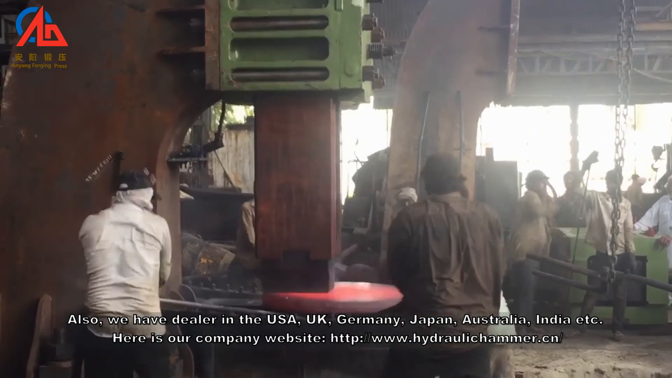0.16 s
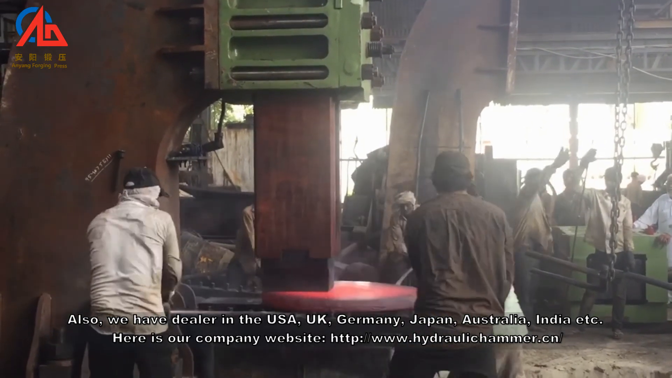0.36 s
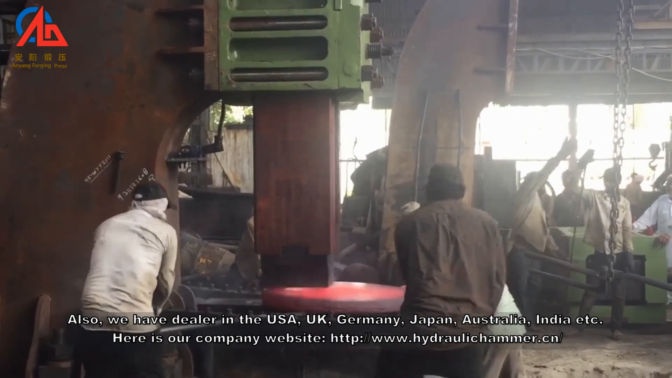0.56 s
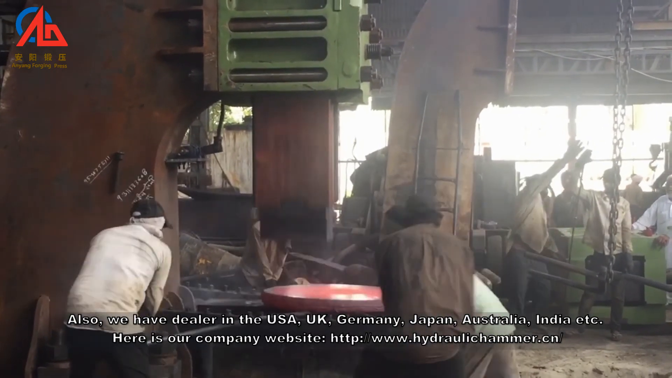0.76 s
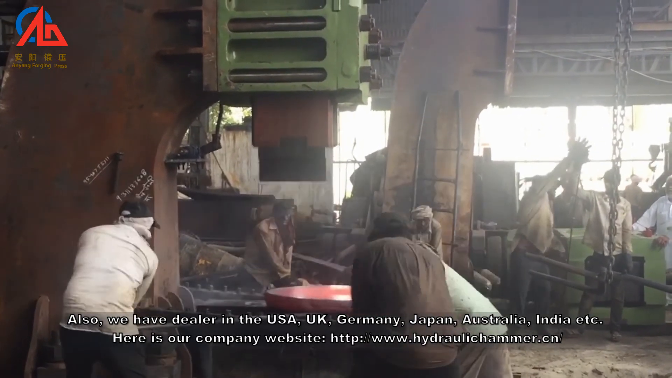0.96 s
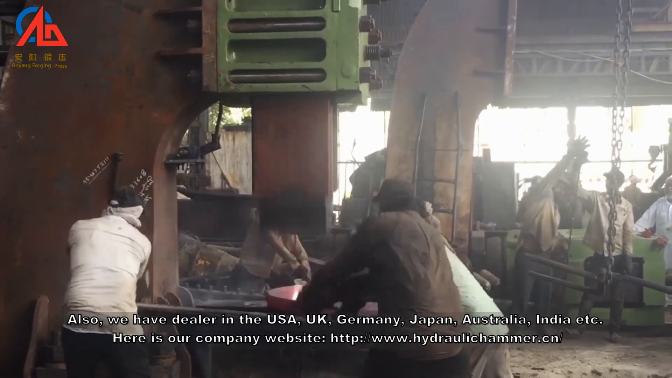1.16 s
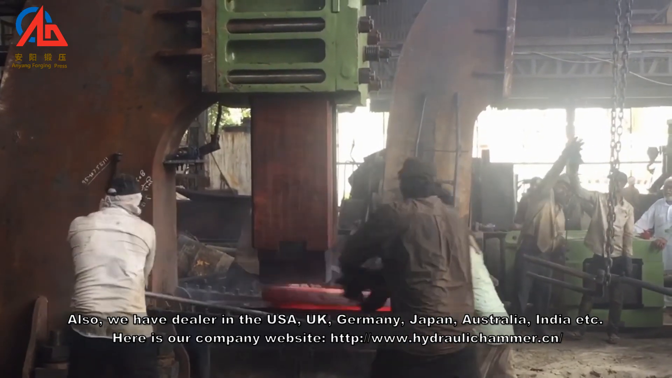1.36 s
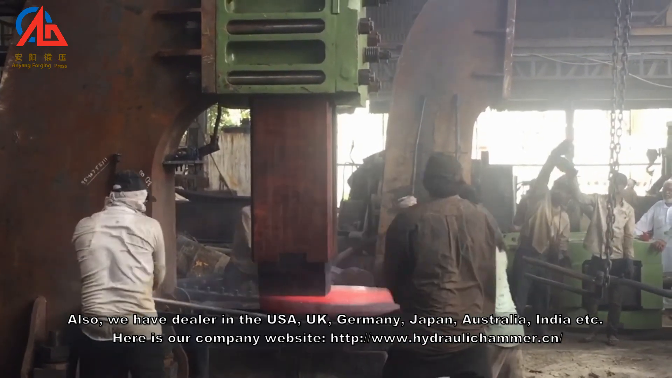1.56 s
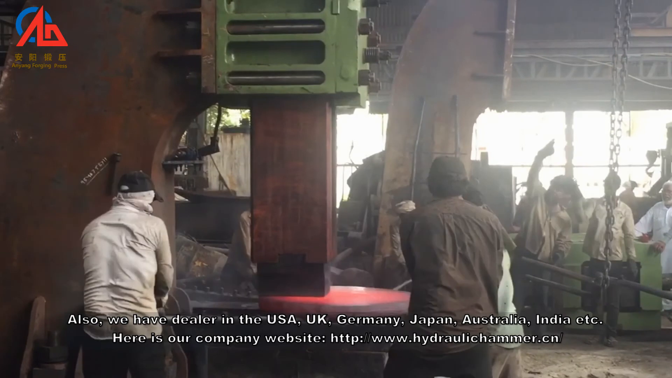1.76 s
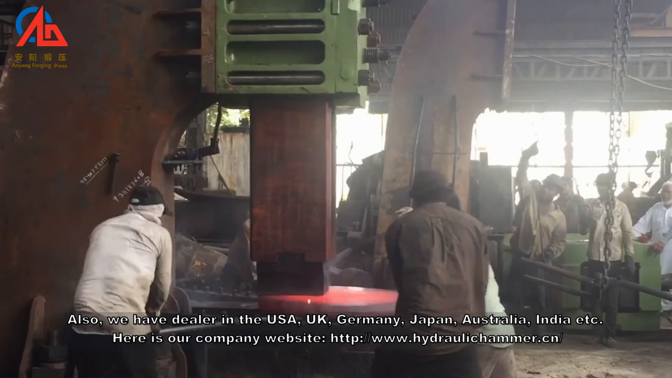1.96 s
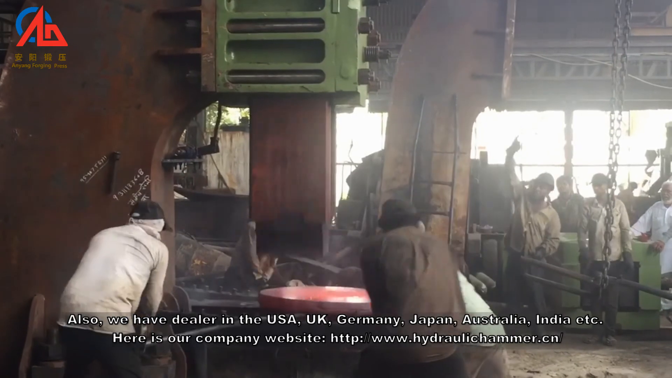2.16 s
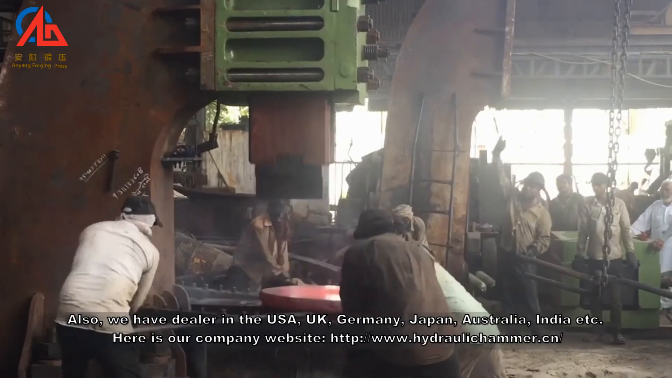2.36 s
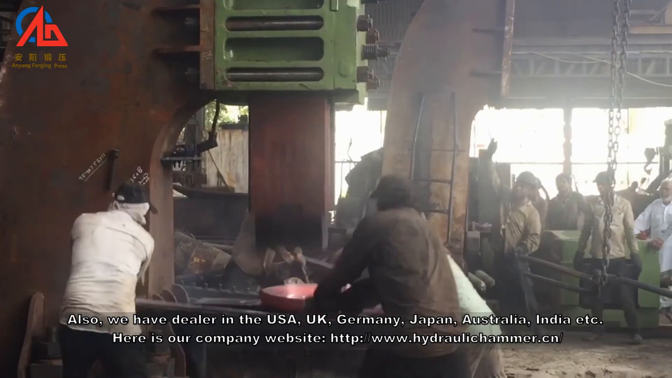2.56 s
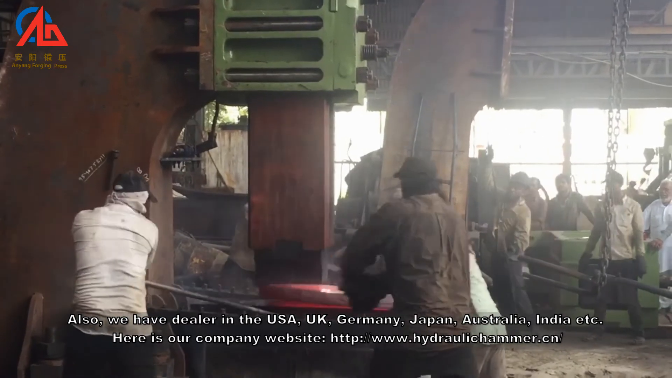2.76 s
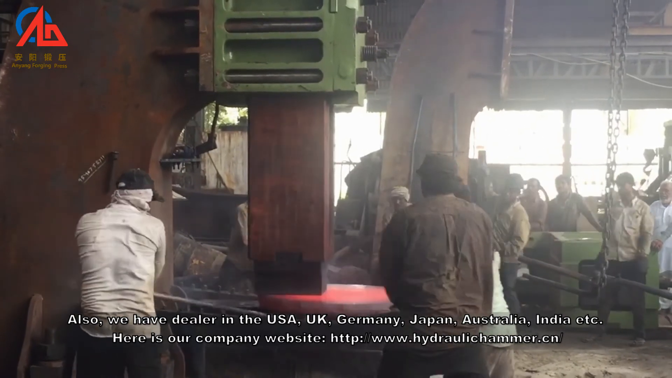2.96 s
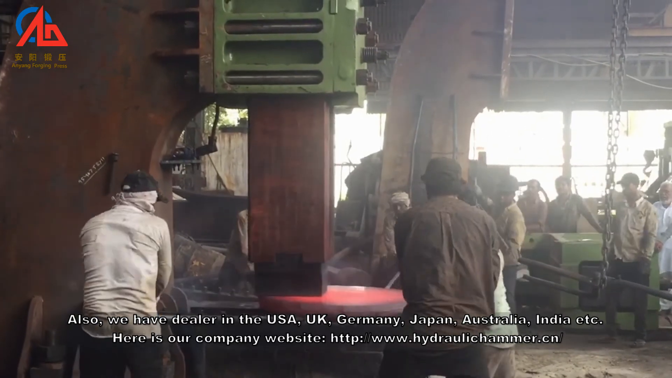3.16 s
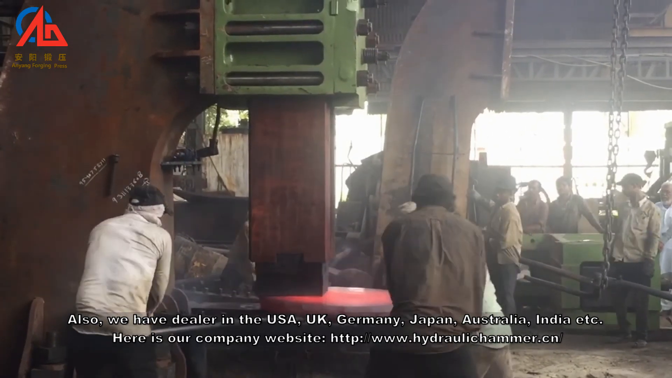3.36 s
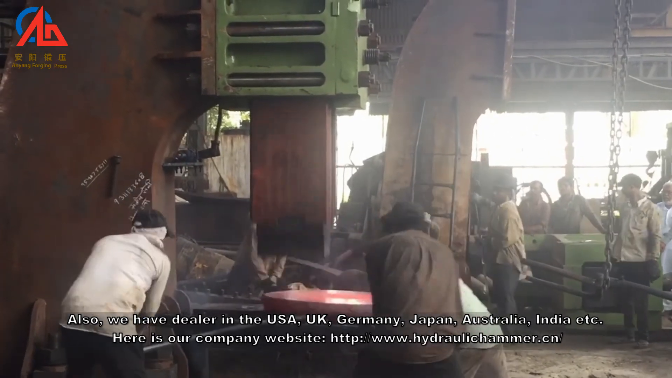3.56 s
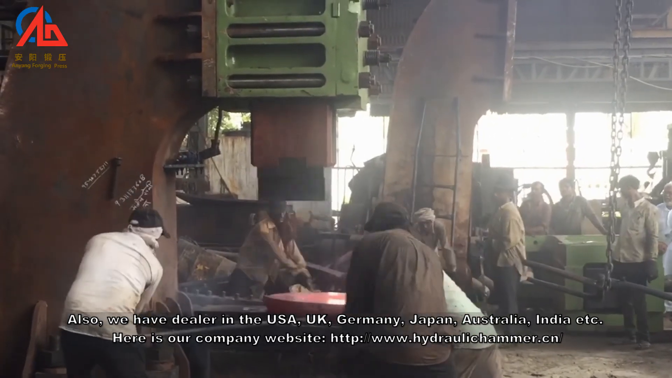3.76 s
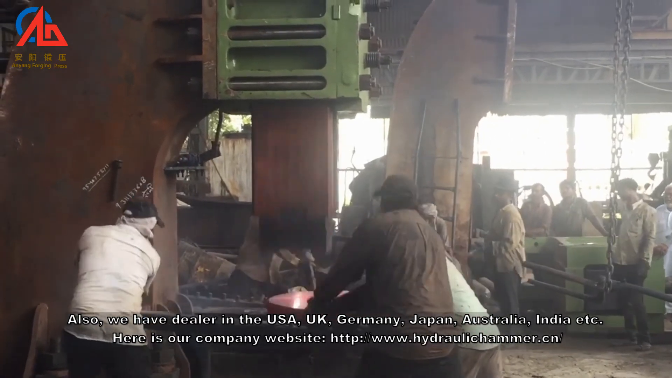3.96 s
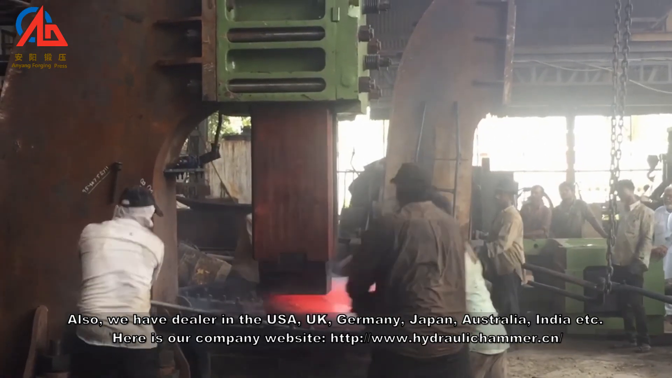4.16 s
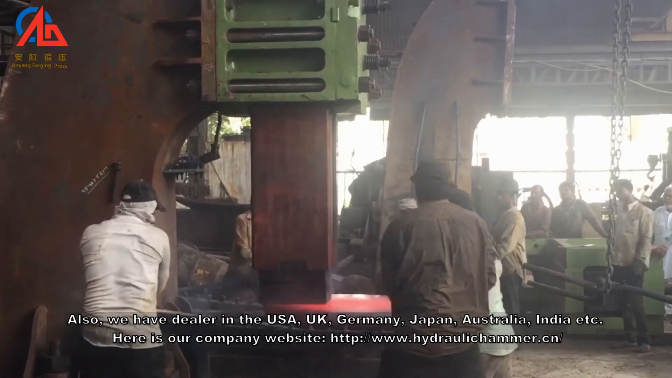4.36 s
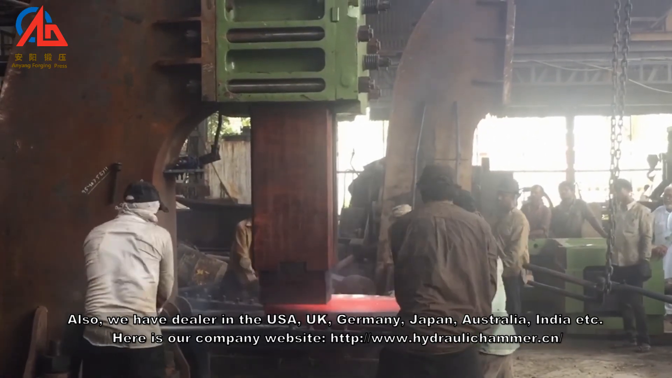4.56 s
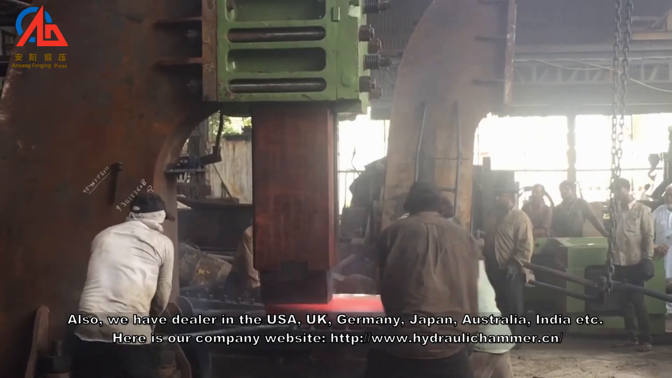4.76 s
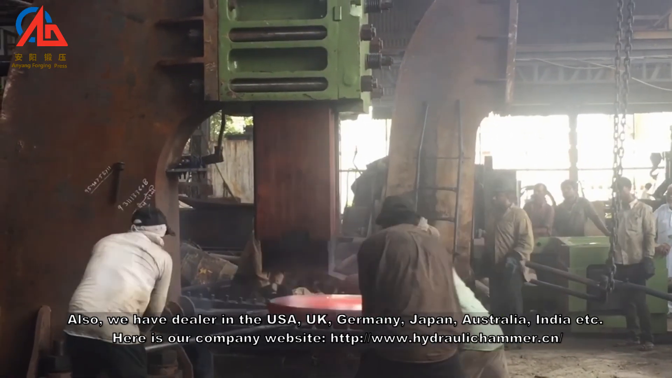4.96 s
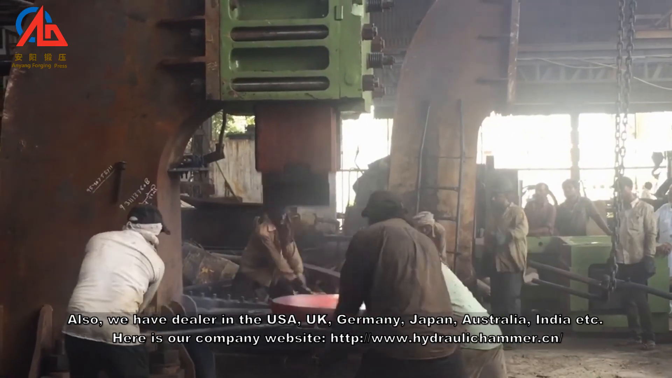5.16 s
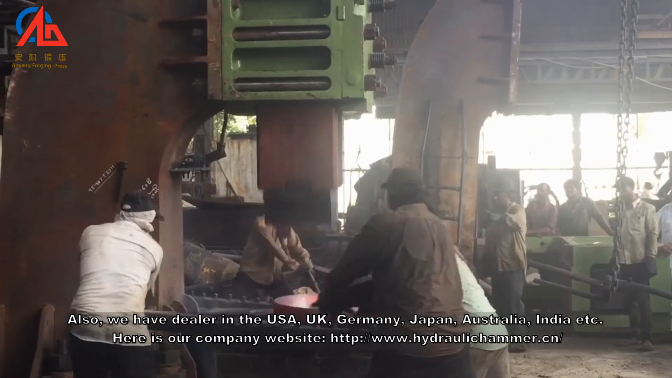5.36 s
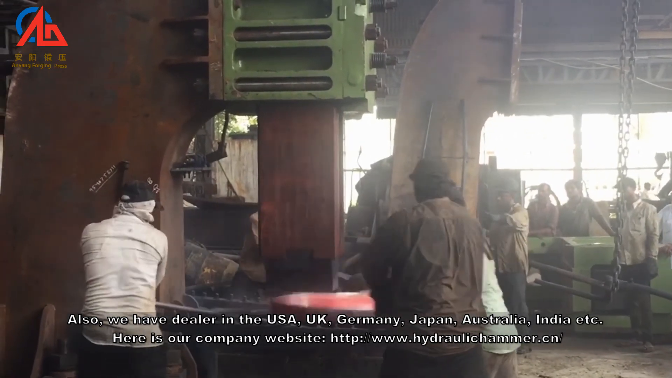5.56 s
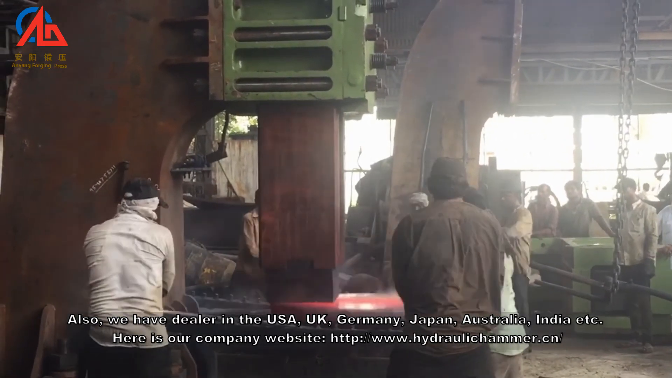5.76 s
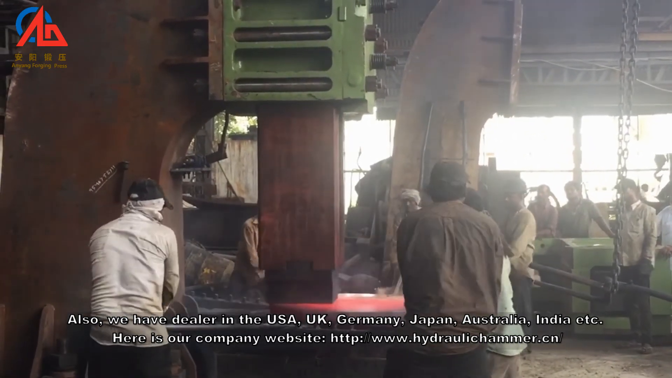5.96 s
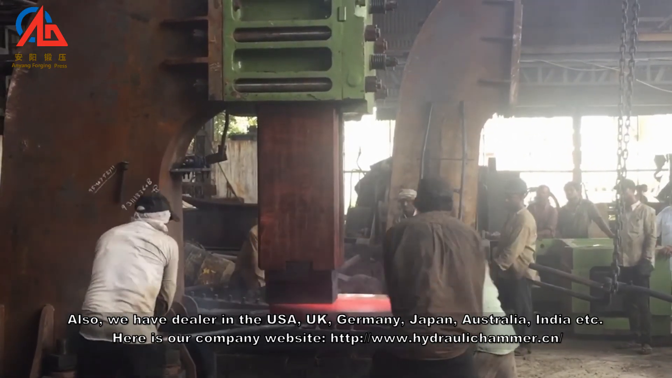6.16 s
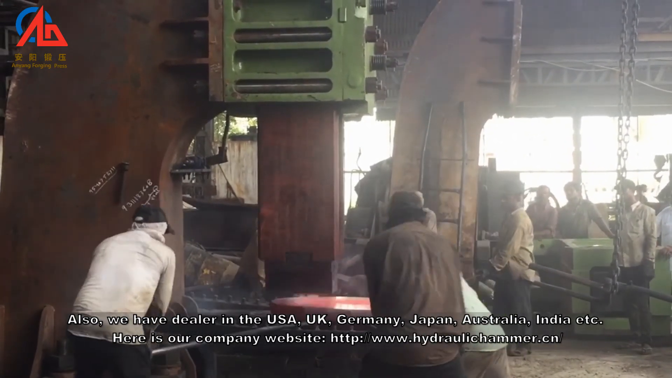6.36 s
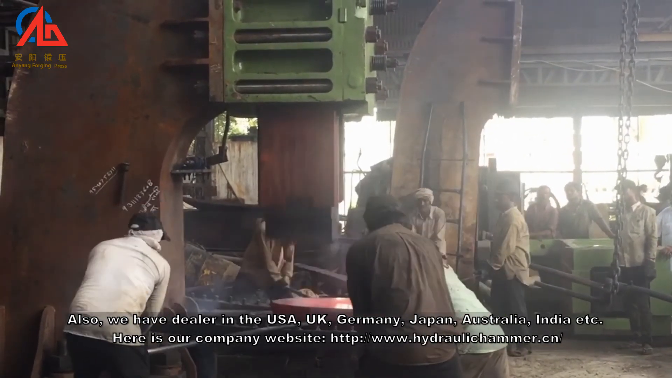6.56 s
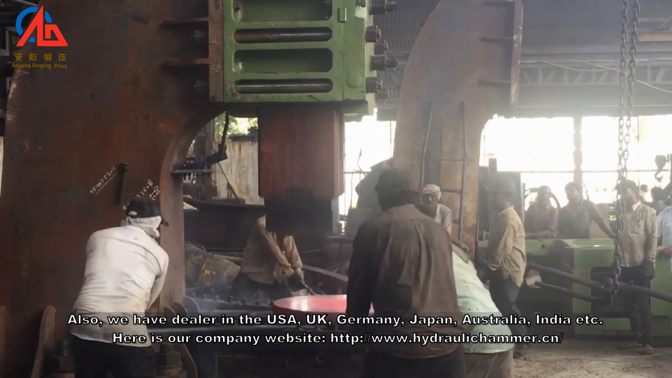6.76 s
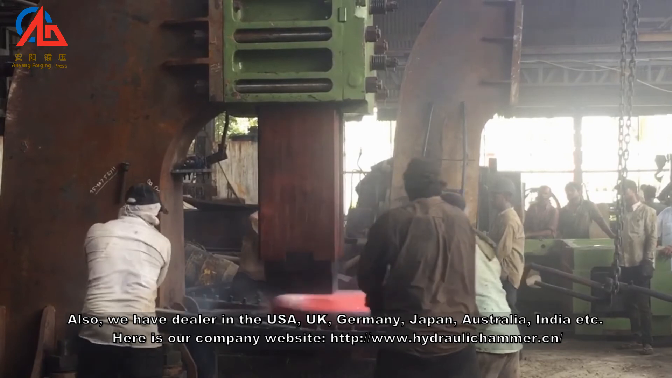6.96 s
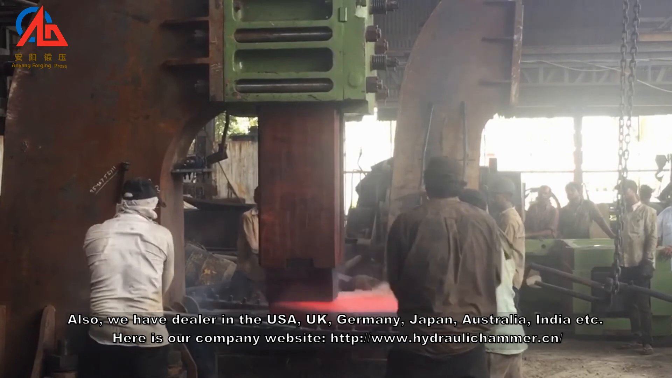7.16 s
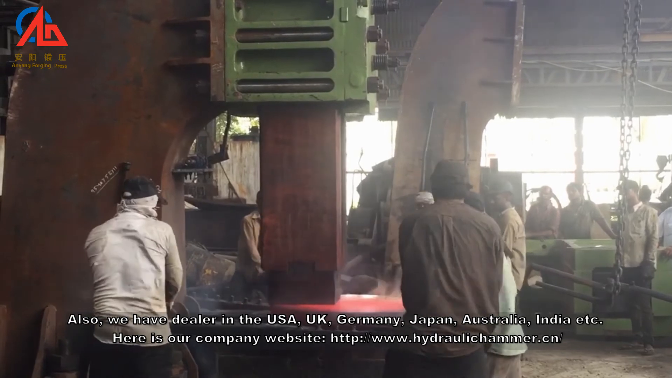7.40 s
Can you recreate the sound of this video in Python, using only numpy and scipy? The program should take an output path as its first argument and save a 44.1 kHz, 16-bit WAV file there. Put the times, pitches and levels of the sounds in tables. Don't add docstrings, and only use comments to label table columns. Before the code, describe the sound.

A massive power hammer forges a hot steel disc in a large, reverberant hall, heard close with slight treble width. Crashing blows land at 0, 1.4, 2.75, 4.15, 5.6 and 7.05 seconds, the first already in progress. Each is an overloaded, distorted slam with deep anvil thump, jangling ram and a bell-like ring near 1500 Hz, strongest on the second and third; a duller rebound follows about 0.2 seconds later. The level sags briefly after impact, while frame shake rumbles and a plate hums faintly. Between blows the ram roars and hisses, building slowly from 0.6 to 1.4, briefly near 2.3, then from 3.4, 4.9 and 6.4. Guides squeal around 2.3, 3.4-4, 5.2 and 6.5-7; valve gear yelps at 1.2, 4, 5.3-5.5 and 6.9. Tools knock around 0.9, 1.2, 2.5 and 3.9. A very high, thin leak whistle wavers throughout, and the last blow's tail carries to the end.

```python
import sys
import numpy as np
from scipy import signal
from scipy.io import wavfile
from scipy.ndimage import uniform_filter1d

SR = 44100
rng = np.random.default_rng(int(sys.argv[2]) if len(sys.argv) > 2 else 0)


def file_out(sig):
    cols = np.atleast_2d(sig).T
    lim = np.clip(cols, -1, 1)
    pcm = np.round(lim * 32767).astype(np.int16)
    wavfile.write(sys.argv[1], SR, pcm)


def boost_factor(decibels):
    exponent = np.asarray(decibels, float) / 20
    return 10 ** exponent


N = 327663

# start_s, crash_db, thump_db, ring_db, bell_db
BLOWS = [
    (-.003, 1.5, 1, 2.5, -6.5),
    (1.3785, 4.5, -0.5, 2, -2),
    (2.756, 4.5, -1.5, 3, -1),
    (4.1653, 3, 0, 3, -6),
    (5.6218, 5.5, 0.5, 2, -5),
    (7.0412, 5, 2, 1.5, -2.5),
]
# freq_hz, level_db (per Hz)
CRASH_SPECTRUM = [(30, -47), (60, -8), (108, 2.5), (235, -2), (342, -13.5), (654, -2.5), (800, -13.5),
                  (1250, -9.5), (2060, -13.5), (4040, -15), (4930, -18.5), (15500, -34.5)]
# freq_hz, t60_s
CRASH_DECAY = [(60, 0.24), (200, 0.4), (600, 0.44), (1500, 0.42), (4000, 0.29), (9000, 0.28), (15000, 0.22)]
# pitch_hz, level_db, t60_s
ANVIL_MODES = [(92.5, -0.5, 0.65), (136.8, 3.5, 0.33), (204.6, -2, 0.42), (362.3, -13.5, 1),
               (559, -14, 0.23), (652, -1, 0.23), (686, -4, 0.25)]
# pitch_hz, level_db, t60_s
RAM_MODES = [(822, -8, .5), (998, -13, .5), (1175, -11, .4), (1404, -9, .3), (1505, -8, .4),
             (1553, -10, .3), (1624, -10, .3), (1744, -7, .5), (1795, -6, .4), (1916, -11, .3),
             (2016, -10, .3), (2140, -10, .35), (2380, -17, .5), (2676, -14, .5), (3144, -15, .3),
             (3307, -15, .3), (3505, -15, .3), (3748, -13, .3), (3851, -14, .3), (3910, -15, .3),
             (4177, -15, .25), (4307, -14, .25), (4478, -21, 1.)]
# start_s, peak_db, low_weight_db, brightness_db, t60_s
KNOCKS = [(0.154, -2.5, -18, 3, 0.83), (0.579, -22.5, -13, 8, 1), (0.918, -13.5, 4.5, -7, 1),
          (1.209, -14.5, -3, 7, 0.41), (1.233, -12, -2, 3, 0.99), (1.569, 0, 5, 2.5, 0.83),
          (2.489, -13.5, -13, -5, 0.48), (2.609, -15.5, 5, 8, 0.28), (2.63, -13, -1.5, -3, 0.99),
          (2.944, 3.5, -1, 4.5, 0.5), (3.892, -11.5, -1, -7, 0.46), (4.027, -14.5, -9, -2, 0.43),
          (4.356, 0, -1, 3.5, 0.3), (4.392, -2.5, 19, 6.5, 1), (5.339, -15, 9, -12, 0.58),
          (5.809, -2.5, 5, 1.5, 0.64), (5.903, -12, -21, 3, 0.5), (6.769, -16, 6, -8, 0.56),
          (6.899, -22, -3, -3, 0.88), (7.243, -3, -2, 1, 1)]
# freq_hz, level_db (per Hz)
KNOCK_SPECTRUM = [(35, -43), (60, -16), (98, 3.5), (226, -9), (721, -8.5), (889, -9), (1520, -7),
                  (3840, -22), (11200, -42), (15500, -53)]
# frame_shake_db, valve_opens_s, first_pressure_db, full_s, full_pressure_db
STROKES = [
    (-2, 0.58, -13, 1.49, 2.5),
    (0, 2.18, -8, 2.35, -5),
    (1, 3.36, -12, 4.14, 0.5),
    (3.2, 4.89, -9.5, 5.464, 1.1),
    (0.5, 6.39, -10, 6.9, -0.5),
    (-1, 7.6, -9.5, 8.4, -1.5),
]
# freq_hz, level_db (per Hz)
SHOP_SPECTRUM = [(15, -54), (25, -9), (66, -20), (136, -3), (233, -9.5), (649, -8), (1050, -11.5),
                 (2360, -21), (2850, -23.5), (3940, -27.5), (6060, -25.5), (7510, -29), (8140, -30.5),
                 (10400, -27), (15500, -35.5)]
# centre_hz, width_hz, level_db
SHOP_HOLLOWS = [(2780, 77, 4.5), (3080, 280, 2), (4230, 150, 2), (8250, 330, 7.5), (10470, 480, -8),
                (11500, 380, 3)]
LAYER_EDGES_HZ = (300, 1800, 6000)
IDLE_DB = [-37, -38, -41, -50]
SHAKE_DB = [-17, -14.5, -31.5, -45]
SHAKE_FALL_DB_PER_S = [60, 57, 46, 45]
PUSH_DB = [-20, -27.5, -25.5, -36.5]
PUSH_FOLLOWS = [0.88, 0.84, 1.07, 1.1]
SURGE_DB = [2, 0.69, 0.2, .6]
GUIDES_HZ = [2300, 2490, 2590, 2750, 2920, 3070, 3190, 3450, 3800, 4390, 4535, 4942, 5320, 5770, 6150, 6620,
             7025, 7480, 8070, 8255, 9000, 9700, 11000, 11400, 12700]
# start_s, length_s, pitch_hz, level_db
SQUEALS = [(.62, .2, 3112, -43), (.62, .2, 2745, -48), (2.2, .16, 3260, -45), (2.3, .13, 2755, -29),
           (2.42, .2, 2756, -47), (2.3, .35, 4942, -45), (2.3, .25, 4393, -48), (2.33, .2, 8150, -44),
           (2.2, .35, 1030, -42), (3.4, .45, 2928, -35), (3.72, .33, 2921, -32), (3.62, .55, 2775, -38),
           (3.45, .3, 6148, -40), (3.8, .3, 6150, -44), (3.5, .6, 4535, -48), (3.7, .3, 4385, -44),
           (3.55, .5, 7020, -48), (3.55, .6, 8070, -48), (3.9, .26, 11803, -45), (5.05, .15, 2545, -40),
           (5.18, .2, 2588, -36), (5.42, .22, 3200, -37), (6.15, .3, 3160, -44), (6.5, .4, 3183, -39),
           (6.86, .2, 3150, -31), (6.55, .25, 2760, -41), (6.88, .17, 2720, -34), (6.5, .3, 3450, -46),
           (6.5, .15, 4945, -47), (6.62, .11, 5285, -40)]
# start_s, pitch_hz, level_db
YELPS = [
    (1.22, 2584, -44),
    (1.22, 1400, -37),
    (4.02, 1300, -31),
    (5.3, 1750, -34),
    (5.47, 1050, -31),
    (6.92, 1420, -32),
    (6.91, 1100, -33),
]
HUM_DB = [-53, -50, -49, -45, -46, -40]
# time_s, pitch_hz
LEAK_PITCH = [(.2, 14881), (.5, 15021), (.81, 14508), (1.21, 15600), (1.4, 15100), (1.7, 14049),
              (2.04, 14575), (2.44, 13988), (2.79, 15032), (3.15, 15371), (3.36, 14985), (3.8, 14955),
              (4.59, 14523), (5.36, 15728), (5.7, 15099), (6.31, 14062), (6.86, 14372), (7.03, 13878)]
# freq_hz, side_against_mid_db
SIDE_DB = [(60, -37), (300, -51), (800, -42.5), (1500, -31), (3100, -20), (6800, -17), (11000, -16),
           (15000, -12)]
# after_blow_s, gain_db
GAIN_SAG = [(0, -5), (.03, -5.5), (.1, -7), (.17, -11), (.3, -5), (.5, -2.5), (.7, -0.5)]

SHUT_DB = -16


def blow(crash_db, thump_db, ring_db, bell_db):
    hz, t = np.fft.rfftfreq(256, 1 / SR), np.arange(SR) / SR
    colour_db, t60 = read(CRASH_SPECTRUM, hz), read(CRASH_DECAY, hz)
    crash = burst(colour_db, t60, count=len(t), rise_s=0.0019)
    add(crash, 0, boost_factor(-5) * clang())
    hall_db = colour_db - 3.7 * np.log2(1 + hz / 1500)
    hall = burst(hall_db, 3.71 * t60, count=len(t), rise_s=0.1)
    thump = ring(ANVIL_MODES, t, spread_db=6.5) * (1 - np.exp(-t / 0.017))
    shimmer = ring(RAM_MODES, t, spread_db=3) * (1 - np.exp(-t / 0.003))
    impact = boost_factor(crash_db) * (crash + boost_factor(-9) * hall)
    return impact + boost_factor(thump_db) * thump + boost_factor(ring_db) * shimmer + bell(bell_db, t)


def bell(level_db, t, pitch_hz=1520, t60=1.5, contact_s=0.135):
    damping_db = -13 * np.clip((t - contact_s) / 0.057, 0, 1) - 60 * t / t60
    press_db = 2.5 * np.exp(-t / 0.03)
    tone = np.exp(2j * np.pi * pitch_hz * t) * (1 + 0.2 * wavering(len(t), 12))
    return boost_factor(level_db + press_db + damping_db) * tone.imag


def clang(count=56):
    place, long = rng.random((count, 2)).T
    hz = 400 * 12 ** place
    db = read(CRASH_SPECTRUM, hz) + 7.5 * np.log10(hz)
    t60 = read(CRASH_DECAY, hz) * (0.44 + 0.91 * long)
    t = np.arange(SR // 3) / SR
    x = ring(np.transpose([hz, db, t60]), t, spread_db=3.5)
    x *= np.minimum(t / 0.0036, 1) * np.minimum((t[-1] - t) / 0.1, 1)
    return x / np.sqrt(np.mean(x[:SR // 50] ** 2))


def knock(peak_db, low_db, bright_db, t60):
    hz = np.fft.rfftfreq(256, 1 / SR)
    weight_db = low_db / (1 + (hz / 350) ** 2)
    tilt_db = bright_db * np.log2(1 + hz / 2500)
    colour_db = read(KNOCK_SPECTRUM, hz) + weight_db + tilt_db
    decay_s = max(t60, 0.04) / (1 + hz / 9000)
    return boost_factor(peak_db - 10.5) * burst(colour_db, decay_s, count=SR * 3 // 4, rise_s=0.0028)


def ram_strokes(squeaks=700):
    frames, hz = N // 256 + 5, np.fft.rfftfreq(1024, 1 / SR)
    field_db = shop_db(hz, np.arange(frames) * 256 / SR)
    lumps = patchy((len(hz), frames), 14, 8)
    flat_db = np.zeros((len(hz), frames // 8)) - 10 * np.log10(len(hz))
    unit = noise(flat_db, size=1024).std()
    out = noise(field_db + 1.52 * lumps + 1.0, size=1024)[:N] / unit
    for when, which, detune, long, loud in rng.random((squeaks, 5)):
        f = GUIDES_HZ[int(which * len(GUIDES_HZ))] * (1 + 0.4 * (detune - 0.5) ** 3)
        t = np.arange(round((0.05 + 0.2 * long ** 2) * SR)) / SR
        around_db = field_db[round(f * 1024 / SR), round(when * (N // 256))]
        db = around_db + 8 + 1.8 * np.log2(f / 2000) + 7 * loud
        add(out, when * N / SR, boost_factor(db) * np.hanning(len(t)) * np.sin(2 * np.pi * f * t))
    return out


def squeal(length_s, pitch_hz, level_db, width_hz=12):
    count = round(length_s * SR)
    t = np.arange(count) / SR
    fade = np.sin(np.pi * np.minimum(t / length_s, 1)) ** 0.5
    tone = np.exp(2j * np.pi * pitch_hz * t) * (0.79 + 0.3 * wavering(count, width_hz))
    return boost_factor(level_db + 3.5) * fade * tone.real


def yelp(pitch_hz, level_db):
    return squeal(0.085, pitch_hz, level_db, width_hz=40)


def plate_hum(level_db):
    return squeal(0.55, 4478, level_db, width_hz=10)


def pressure_db(t, open_s=0.045, vent_s=0.15, bend=1.45):
    out = np.full(len(t), float(SHUT_DB))
    ends = [row[0] for row in BLOWS[1:]] + [np.inf]
    for (_, opens, first_db, full, full_db), end in zip(STROKES, ends):
        progress = np.clip((t - opens) / (full - opens), 0, 1)
        build_db = first_db + (full_db - first_db) * progress ** bend
        opening, venting = (t - opens) / open_s + 1, 1 - (t - end) / vent_s
        valve = np.clip(np.minimum(opening, venting), 0, 1)
        out = np.maximum(out, SHUT_DB + valve * (build_db - SHUT_DB))
    return out


def layers_db(t, shake_peak_s=0.21, shake_rise_db=14):
    settings = [IDLE_DB, SHAKE_DB, SHAKE_FALL_DB_PER_S, PUSH_DB, PUSH_FOLLOWS, SURGE_DB]
    idle, shake, fall, push, follows, surge = np.array(settings)[..., None]
    power = boost_factor(2 * idle) + boost_factor(2 * (push + follows * pressure_db(t)))
    for (start, *_), (frame_db, *_) in zip(BLOWS, STROKES):
        late = t - start - shake_peak_s
        shape_db = np.minimum(shake_rise_db * late / shake_peak_s, -fall * late)
        power = power + boost_factor(2 * (shake + frame_db + shape_db)) * (t > start)
    slow = uniform_filter1d(rng.standard_normal(len(t)), size=12)
    slow = evened(uniform_filter1d(slow, size=12))
    return 10 * np.log10(power) + surge * slow


def shop_db(hz, t):
    colour_db = read(SHOP_SPECTRUM, hz)
    for f, width, db in SHOP_HOLLOWS:
        colour_db = colour_db + db / (1 + (2 * (hz - f) / width) ** 2)
    band = np.searchsorted(LAYER_EDGES_HZ, hz)
    share_db = [10 * np.log10(np.sum(boost_factor(colour_db[band == k]) ** 2)) for k in range(4)]
    level_db = layers_db(t) - np.array(share_db)[:, None]
    centres = np.log([110, 750, 3300, 9600])
    place = np.interp(np.log(hz + 1), centres, range(4))
    low = np.minimum(place.astype(int), 2)
    glide = (place - low)[:, None] * (level_db[low + 1] - level_db[low])
    return colour_db[:, None] + level_db[low] + glide


def leak():
    s, hz = np.transpose(LEAK_PITCH)
    t = np.arange(N) / SR
    smooth_hz = uniform_filter1d(np.interp(t, s, hz), size=5000)
    turn = np.exp(2j * np.pi * np.cumsum(smooth_hz) / SR)
    level = boost_factor(-54) + boost_factor(-44 + 1.3 * pressure_db(t))
    return level * (turn * (0.68 + 0.63 * wavering(N, 45))).real


def side_of(mid):
    hz, _, z = signal.stft(mid, SR, nperseg=256)
    scramble = np.exp(2j * np.pi * rng.random(z.T.shape).T)
    patches = patchy(z.shape, 14, 18)
    level_db = read(SIDE_DB, hz)[:, None] + 8.9 * np.minimum(patches, 1.6) - 1.5
    return signal.istft(z * scramble * boost_factor(level_db), SR, nperseg=256)[1][:N]


def evened(x):
    return x / np.sqrt(np.mean(x ** 2) + 1e-20)


def patchy(shape, bins, frames):
    field = rng.standard_normal(shape[::-1]).T
    field = uniform_filter1d(field, size=bins, axis=0)
    return evened(uniform_filter1d(field, size=frames, axis=1))


def read(points, hz):
    f, value = np.transpose(points)
    return np.interp(np.log(hz + 1), np.log(f + 1), value)


def add(mix, s, sound):
    at = round(s * SR)
    part = mix[max(at, 0):][:len(sound) + min(at, 0)]
    part += sound[max(-at, 0):][:len(part)]


def noise(db, size):
    a, b = rng.standard_normal((db.shape[1], db.shape[0], 2)).T
    return signal.istft((a + 1j * b) * boost_factor(db), nperseg=size, noverlap=size * 3 // 4)[1]


def burst(colour_db, t60, count, rise_s):
    t = np.arange(count // 64 + 5) * 64 / SR
    x = noise(colour_db[:, None] - 60 * t / t60[:, None], size=256)[:count]
    rise = np.minimum(np.arange(count) / SR / rise_s, 1)
    return x / np.sqrt(np.mean(x[:SR // 50] ** 2)) * rise


def ring(modes, t, spread_db):
    hz, db, t60 = np.transpose(modes)[..., None]
    phase, chance = rng.random((len(modes), 2)).T[..., None]
    level = boost_factor(db + spread_db * (2 * chance - 1.5) - 60 * t / t60)
    return (level * np.sin(2 * np.pi * (hz * t + phase))).sum(0)


def wavering(count, width_hz):
    r = np.exp(-np.pi * max(width_hz, 1.0) / SR)
    a, b = rng.standard_normal((count + SR // 4, 2)).T
    slow = signal.lfilter([1], [1, -2 * r, r * r], a + 1j * b)[SR // 4:]
    return slow / np.sqrt(np.mean(abs(slow) ** 2))


def scene():
    mid = ram_strokes() + leak()
    for (s, *row), hum_db in zip(BLOWS, HUM_DB):
        add(mid, s, blow(*row))
        add(mid, s, plate_hum(hum_db))
    for sound, table in [(knock, KNOCKS), (squeal, SQUEALS), (yelp, YELPS)]:
        for s, *row in table:
            add(mid, s, sound(*row))
    side = side_of(mid)
    return np.array([mid + side, mid - side])


def roll_off(x):
    return signal.sosfilt(signal.butter(12, 15680, fs=SR, output="sos"), x)


def record(dry):
    t = np.arange(N) / SR
    after, db = np.transpose(GAIN_SAG)
    thin = signal.sosfilt(signal.butter(2, 62, "highpass", fs=SR, output="sos"), dry)
    sag_db = sum(np.interp(t - row[0], after, db, 0, 0) for row in BLOWS)
    clipped = np.clip(thin * boost_factor(sag_db), -0.96, 0.96)
    return roll_off(clipped)


dry = scene()
out = record(dry)
file_out(out)
```